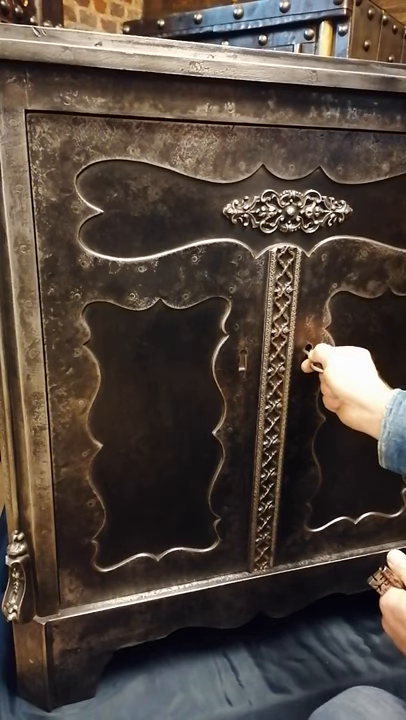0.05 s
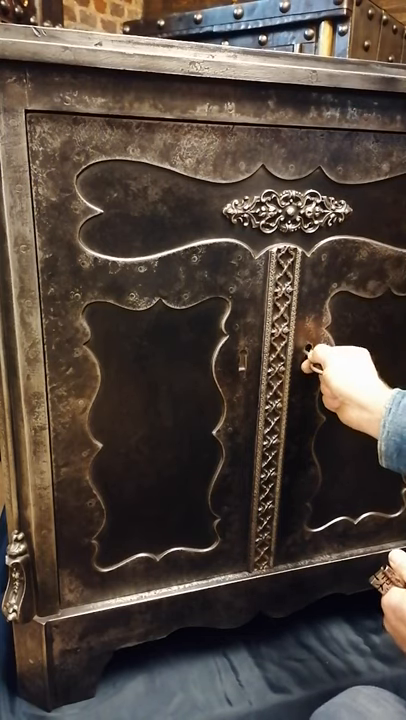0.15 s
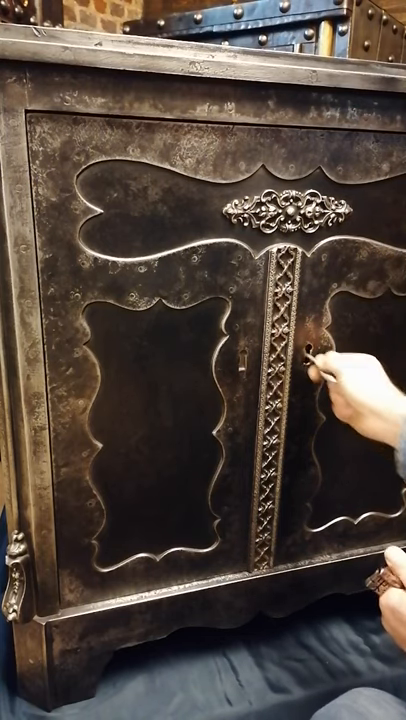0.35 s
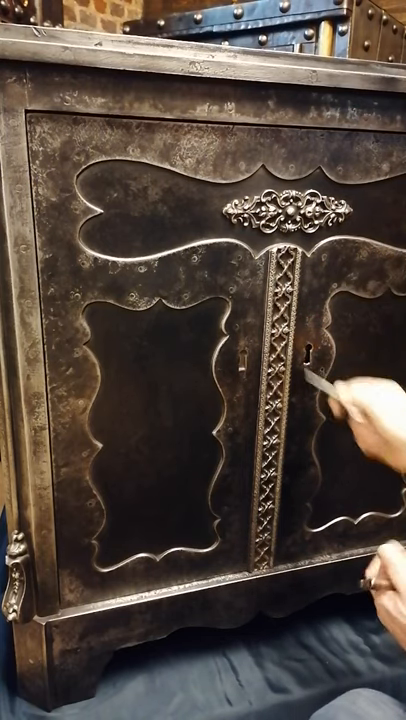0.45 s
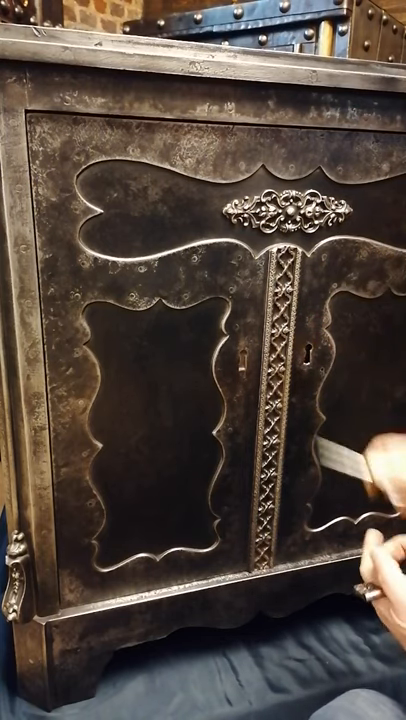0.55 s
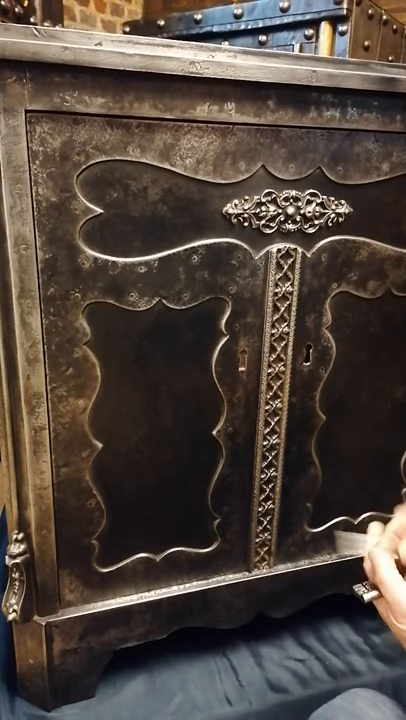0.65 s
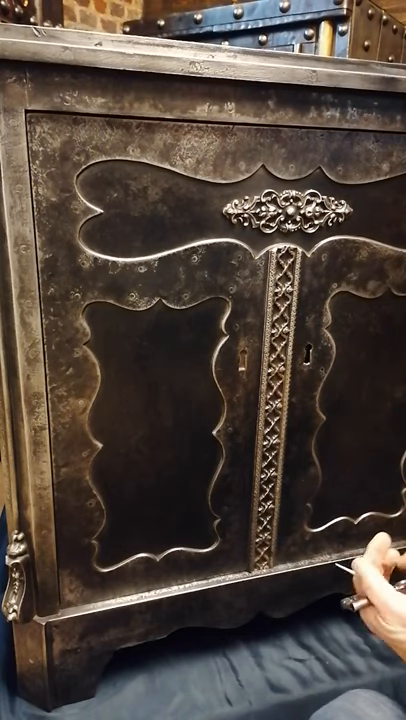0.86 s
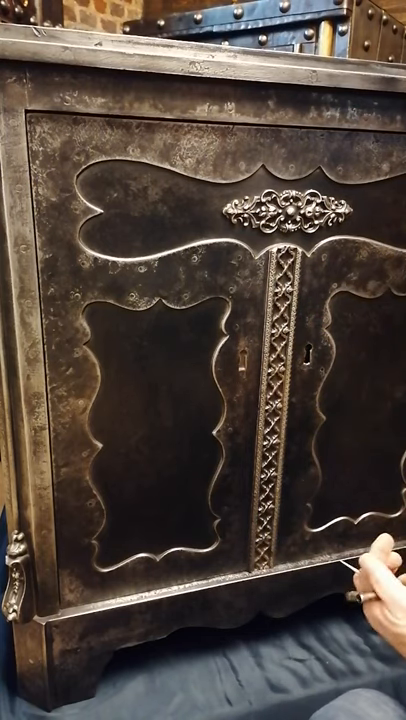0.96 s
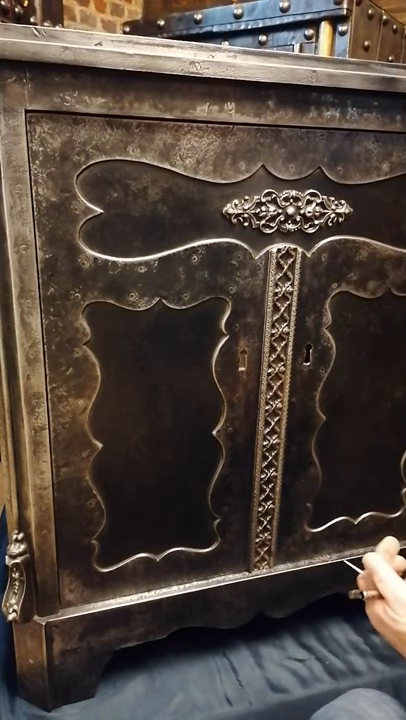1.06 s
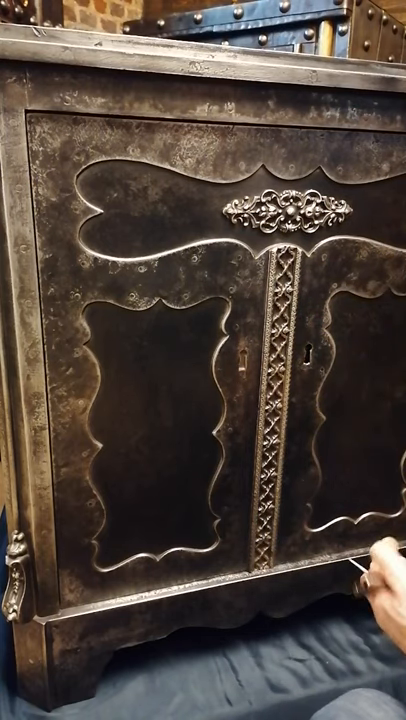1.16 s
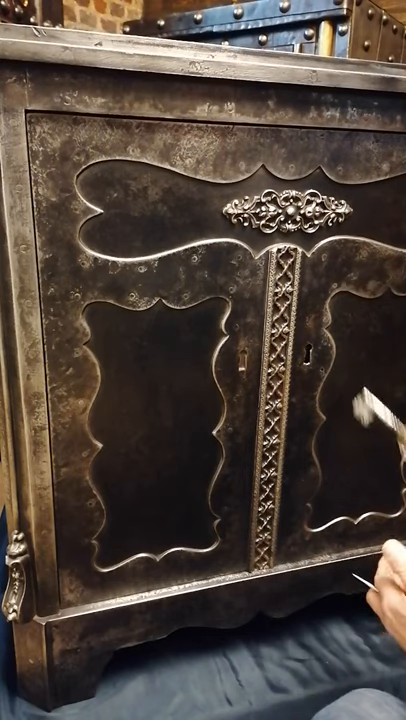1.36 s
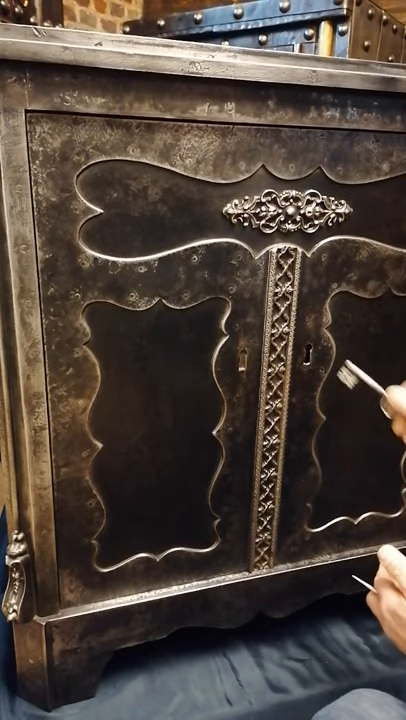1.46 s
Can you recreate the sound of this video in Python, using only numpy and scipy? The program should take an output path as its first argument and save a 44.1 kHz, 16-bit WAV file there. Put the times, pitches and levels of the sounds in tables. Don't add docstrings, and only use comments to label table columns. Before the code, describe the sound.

A heavy iron lock bolt clunks in a cabinet door. Soft dull lever knocks from 0.09 seconds lead to a loud, bouncing slam at 0.22, with deep boom and metallic ring decaying. At 0.46 a sharp click starts the key's gritty scrape; a bright chink rings at 0.57, fading by 0.75. A tiny click follows at 0.79, then quiet room hiss and faint low motor hum, left-heavy.

```python
import sys
import numpy as np
from scipy import signal
from scipy.fft import rfft, irfft
from scipy.io import wavfile

SR = 44100
rng = np.random.default_rng(int(sys.argv[2]) if len(sys.argv) > 2 else 0)


def wav_record(signal):
    frames = np.transpose(np.atleast_2d(signal))
    bounded = np.clip(frames, -1, 1)
    quanta = np.round(bounded * 32767).astype(np.int16)
    wavfile.write(sys.argv[1], SR, quanta)


def to_linear_factor(level_db):
    exponent = np.asarray(level_db, float) / 20
    return 10 ** exponent


N = 66150

# start_s [s], level_db [dB]
BOLT_BLOWS = [
    (.2205, -10.5),
    (.2222, 0),
    (.2238, -0.5),
    (.2275, -4),
    (.2325, -10),
    (.238, -13),
    (.262, -13.5),
]


def on_hz(table, hz):
    pitch, value = np.array(table).T
    return np.interp(np.log(hz), np.log(pitch), value)


def mix_alike(one, other, alike):
    alike = np.clip(alike, 0, 1)
    return alike * one + np.sqrt(1 - alike * alike) * other


def ports(one, other, hz):
    # pitch_hz [Hz], likeness [0-1]
    likeness = [(100, 1.2), (300, 1.2), (600, 0.58), (1200, 0), (3000, 0.05), (9000, 0.03)]
    # pitch_hz [Hz], lead_db [dB]
    left_lead = [(60, 5), (150, 7), (1000, 6), (4000, 6.8), (9000, 8.5), (14000, 5)]
    half_lead_db = on_hz(left_lead, hz) / 2
    right = mix_alike(one, other, on_hz(likeness, hz))
    return np.array([one * to_linear_factor(half_lead_db), right * to_linear_factor(-half_lead_db)])


def band(hz, octaves, size):
    f = np.maximum(np.fft.rfftfreq(size, 1 / SR), 1)
    bell = np.exp(-(np.log2(f / hz) / octaves) ** 2)
    return irfft(rfft(rng.standard_normal((2, size))) * bell, size)


def unit_band(hz, octaves, size):
    return ports(*band(hz, octaves, size), hz) * np.sqrt(SR / hz / octaves / 4)


def fade(t60, size):
    return to_linear_factor(-60 * np.arange(size) / SR / max(t60, .004))


def rise(s, size):
    return 1 - np.exp(-(np.arange(size) / SR / max(s, 1e-4)) ** 2)


def dense(colour, t60, size=N // 2):
    centres = 100 * 2 ** (np.arange(23) / 3)
    gains = to_linear_factor(on_hz(colour, centres))
    noise = rfft(rng.standard_normal((2, size)))
    octave = np.log2(np.maximum(np.fft.rfftfreq(size, 1 / SR), 1))
    out = 0
    for hz, gain in zip(centres, gains):
        bell = np.exp(-((octave - np.log2(hz)) / .27) ** 2)
        out = out + gain * ports(*irfft(noise * bell, size), hz) * fade(t60(hz), size)
    return out / np.sqrt(np.sum(gains ** 2 * centres) / SR)


def modes(table, split=0., size=16384):
    twin = to_linear_factor(2)
    w = 2 * np.pi * np.arange(size) / SR
    out = 0
    for hz, db, t60 in table:
        pair = np.array([np.sin(w * hz), np.cos(w * hz)])
        if split:
            near = band(hz, split, size)
            near = near / np.std(near) / np.sqrt(2)
            pair = (pair + twin * near) / np.hypot(1, twin)
        out = out + to_linear_factor(db) * fade(t60, size) * ports(*pair, hz)
    return out


def strike(hits, response):
    push = np.zeros(N)
    for s, db in hits:
        push[int(s * SR)] += to_linear_factor(db)
    return signal.fftconvolve(push[None], response, axes=1)[:, :N]


def beats(hits, t60):
    return strike(hits, fade(t60, N // 8)[None])


def motor_hum():
    # start_s [s], pitch_hz [Hz], level_db [dB], left_lead_db [dB]
    path = [(0, 62, -71, 4), (.12, 62, -69, 4), (.24, 61.5, -67, 6), (.29, 61, -74, 6), (.38, 60, -66, 6),
            (.47, 60.5, -68, 6), (.56, 62, -65, 7), (.63, 60, -73, 6), (.76, 61, -71, 5), (.88, 62, -63, 6),
            (1.05, 62.5, -61.5, 6), (1.17, 62.7, -64, 1), (1.3, 63.3, -66.5, 0), (1.5, 62.6, -70, 2)]
    t = np.arange(N) / SR
    s, hz, db, lead_db = np.array(path).T
    side_db = np.interp(t, s, lead_db) / 2 * np.array([[1], [-1]])
    phase = 2 * np.pi * np.cumsum(np.interp(t, s, hz)) / SR + 3.0
    return np.sqrt(2) * to_linear_factor(np.interp(t, s, db) + side_db) * np.sin(phase)


def room_hiss():
    # pitch_hz [Hz], level_db [dB per Hz]
    colour = [(20, -8.5), (60, -7.5), (110, -11), (277, -21.5), (485, -22.5), (2000, -28.5), (5380, -36.5),
              (10000, -43.5), (16000, -42.5)]
    # start_s [s], level_db [dB]
    swell = [(0, 1), (.7, 5.5), (.9, 5), (1.2, 2.5), (1.5, 2.5)]
    f = np.maximum(np.fft.rfftfreq(N, 1 / SR), 1)
    one, other = irfft(rfft(rng.standard_normal((2, N))) * to_linear_factor(on_hz(colour, f)), N)
    pair = np.array([one * to_linear_factor(2.5), mix_alike(one, other, 0.1)])
    swell_db = np.interp(np.arange(N) / SR, *np.array(swell).T)
    return pair / np.std(one) * to_linear_factor(-75.5 + swell_db)


def sleeve_rustle():
    # centre_s [s], half_length_s [s], pitch_hz [Hz], width [octaves], level_db [dB]
    rustles = [
        (0.74, .07, 2500, 0.47, -82),
        (1, 0.044, 7000, 0.36, -90),
        (.02, 0.066, 205, 1, -75.5),
    ]
    t = np.arange(N) / SR
    out = 0
    for s, half, hz, wide, db in rustles:
        cloth = band(hz, wide, N)
        out = out + cloth / np.std(cloth) * to_linear_factor(db) * np.exp(-((t - s) / half) ** 2)
    return out


def levers():
    # start_s [s], level_db [dB], dull_top_hz [Hz], t60_s [s]
    shifts = [
        (.0885, -59.5, 560, .2),
        (.103, -71, 1300, .12),
        (.133, -63.5, 600, 0.29),
        (.182, -56, 1300, .12),
        (0.195, -52.5, 800, 0.24),
        (0.214, -43, 550, .1),
    ]
    out = 0
    for s, db, hz, t60 in shifts:
        colour = [(100, -8), (hz, 0), (1.5 * hz, -25), (4 * hz, -42)]
        knock = dense(colour, lambda f: t60, size=8192)
        out = out + strike([(s, db)], rise(0.0012, 8192) * knock)
    return out


def door_boom():
    # pitch_hz [Hz], level_db [dB], t60_s [s]
    deep_modes = [(151.8, 4.5, 0.27), (137.5, -8.5, 0.19), (143.5, -11.5, 0.93)]
    # start_s [s], level_db [dB]
    pushes = [
        (.09, -66),
        (.184, -51.5),
        (.2155, -40),
        (.2235, -35.5),
        (.4, -61),
        (.66, -63),
        (.78, -71),
        (.9, -71),
    ]
    return strike(pushes, modes(deep_modes, size=N // 2) * rise(0.013, N // 2))


def key_clicks():
    # start_s [s], level_db [dB], pitch_hz [Hz], width [octaves], t60_s [s]
    clicks = [(0.4612, -42, 9800, 0.14, 0.022), (0.4595, -49, 4850, 0.64, 0.012),
              (.2145, -61, 2500, 1.2, .1), (.2175, -51.5, 4400, 1.3, .1), (.53, -69, 13000, .3, 0.43),
              (.551, -55, 9700, 0.092, .03), (0.461, -61, 1730, 0.22, 0.64), (0.461, -66, 4650, 0.071, 0.5),
              (0.465, -47.5, 1880, 0.17, 0.042), (0.466, -53, 7730, 0.053, 0.033),
              (0.521, -57, 7300, 0.12, 0.097), (0.5218, -50, 9400, 0.067, 0.024),
              (0.7925, -70.5, 1060, 0.071, 0.03), (.7925, -62, 1340, 0.11, 0.033),
              (.7918, -68, 13000, .3, .012), (0.7938, -58.5, 1970, .2, 0.014),
              (.7918, -62.5, 5200, 1, 0.0092), (0.7921, -62.5, 9400, 0.23, 0.014)]
    out = 0
    for s, db, hz, wide, t60 in clicks:
        ring = unit_band(hz, wide, 16384) * rise(0.00017, 16384)
        decay = fade(t60, 16384) + to_linear_factor(-19) * fade(0.5, 16384)
        tick = modes([(hz, 2, 2.06 / hz / wide)], size=2048)
        out = out + strike([(s, db)], tick) + strike([(s, db)], ring * decay)
    return out


def bolt_crack():
    # pitch_hz [Hz], level_db [dB per Hz]
    colour = [(110, -33.5), (300, -20.5), (700, -12), (1700, -17), (3200, -17.5), (5200, -14.5),
              (7000, -22.5), (9600, -14), (15500, -23.5)]
    noise = strike([(BOLT_BLOWS[0][0], 0)], dense(colour, lambda f: np.inf, size=8192))
    return to_linear_factor(-29.5) * noise * beats(BOLT_BLOWS, 0.026)


def bolt_ring():
    # pitch_hz [Hz], level_db [dB], t60_s [s]
    panel_modes = [(278.5, -15.5, 0.87), (382.3, -13.5, 0.17), (433.4, -15, 0.6), (585, -12.5, 0.68),
                   (663, -14, 0.46), (750, -18, .5), (805, -10.5, 0.26), (1016, -14, 0.24),
                   (1091, -17.5, 0.62), (1132, -11.5, 0.18), (1221, -14, 0.24)]
    # pitch_hz [Hz], level_db [dB], t60_s [s]
    upper_modes = [(1599, -17.5, 0.49), (1747, -15, 0.42), (1896, -16, 0.52), (2062, -18, 0.68),
                   (2316, -23.5, .4), (2853, -20, 0.67)]
    # pitch_hz [Hz], level_db [dB], t60_s [s]
    plate_modes = [(2993, -10.5, 0.28), (3860, -17.5, .35), (4592, -12, 0.11), (4695, -7.5, .45),
                   (4800, -13, .2), (5080, -13, .2), (5460, -13.5, 0.37), (5400, -13, .15),
                   (7235, -20.5, .3), (9450, -7, 0.15), (12860, -7, 0.058)]
    # pitch_hz [Hz], level_db [dB], t60_s [s]
    clang_modes = [(1579, -33.5, 0.1), (1772, -28.5, 0.051), (5400, -38, .04), (9650, -39.5, .05),
                   (12960, -46.5, .04), (14900, -46.5, .04)]
    door = to_linear_factor(-31) * (modes(panel_modes, .03) + modes(upper_modes, .03))
    plate = to_linear_factor(-37) * modes(plate_modes, .012)
    ring = door + plate + modes(clang_modes)
    return strike(BOLT_BLOWS[1:2], ring * rise(0.00071, 16384))


def iron_tail():
    # pitch_hz [Hz], level_db [dB per Hz]
    colour = [(110, -29.5), (230, -16), (420, -12.5), (1000, -13.5), (2480, -18), (4740, -15), (7000, -26),
              (9600, -15.5), (15500, -31)]
    # pitch_hz [Hz], t60_s [s]
    decay = [(100, 1), (500, 0.69), (2000, 0.54), (6000, 0.46), (10000, 0.28), (14000, 0.27)]
    # pitch_hz [Hz], level_db [dB], width [octaves], t60_s [s]
    crowds = [(1770, -42, 0.3, 0.72), (4750, -42.5, 0.065, .5), (5500, -47, .07, 0.79),
              (7200, -52, .08, .4), (9430, -42.5, 0.036, .45), (12700, -62, .05, .3)]
    tail = dense(colour, lambda f: on_hz(decay, f)) * rise(0.012, N // 2)
    case = 0
    for hz, db, wide, t60 in crowds:
        case = case + to_linear_factor(db) * unit_band(hz, wide, N // 2) * fade(t60, N // 2)
    return strike([(BOLT_BLOWS[0][0], 0)], to_linear_factor(-32) * tail + case * rise(.006, N // 2))


def key_scrape():
    # start_s [s], level_db [dB]
    effort = [
        (.44, -95),
        (.459, -70),
        (.463, -46),
        (.5, -51.5),
        (.55, -51.5),
        (.6, -56.5),
        (.65, -63.5),
        (.72, -77.5),
        (.76, -130),
    ]
    # pitch_hz [Hz], level_db [dB per Hz]
    colour = [(150, -33.5), (300, -7.5), (883, -19.5), (1870, -18), (3400, -11.5), (5500, -19), (9500, -19),
              (15000, -47)]
    slips_per_s, spread_db = 240, -1
    effort_db = np.interp(np.arange(N) / SR, *np.array(effort).T)
    slip_db = spread_db * np.minimum(rng.exponential(1, N), 3) + effort_db
    slips = (rng.random(N) < slips_per_s / SR) * rng.choice([-1, 1], N) * to_linear_factor(slip_db)
    response = dense(colour, lambda f: 0.091, size=4096)
    return signal.fftconvolve(slips[None], response, axes=1)[:, :N] * to_linear_factor(-9.0)


def key_shaft():
    # pitch_hz [Hz], level_db [dB], t60_s [s]
    shaft_modes = [(1837, -63.5, 0.14), (3390, -57.5, 0.39), (3560, -60, 0.16), (4740, -63.5, 0.23),
                   (5850, -65, .2)]
    return strike([(.4612, 0)], modes(shaft_modes, .05))


def door_knocks():
    # start_s [s], level_db [dB]
    knocks = [
        (.49, -56.5),
        (.535, -56.5),
    ]
    # pitch_hz [Hz], level_db [dB], t60_s [s]
    knock_modes = [(276.4, -1, 0.32), (500, -19, 0.19), (640.4, -7.5, 0.26), (753, -13, 0.46)]
    return strike(knocks, modes(knock_modes, .012, size=8192) * rise(0.0031, 8192))


def blade_chink():
    # start_s [s], level_db [dB]
    touches = [
        (.566, 3),
        (.5685, -12),
        (.571, 9),
        (.574, -22),
        (.579, -17),
    ]
    # start_s [s], level_db [dB]
    rings = [
        (.5655, 1.5),
        (.593, -8),
        (.641, -14),
    ]
    # pitch_hz [Hz], level_db [dB], t60_s [s]
    blade_modes = [(5840, 1, 0.29), (6100, -5, .3), (6100, -3.5, 0.2), (6530, -18, .2), (7165, 0, 0.23),
                   (7420, 2.5, 0.11), (7950, -4, .15), (8170, -6, 0.1), (8750, -14, 0.14), (9500, -2, 0.13),
                   (9800, 8, 0.096), (9700, -4, 0.097), (12360, -6, 0.13), (13610, -7, .15)]
    colour = [(3000, -9.0), (5000, -22), (6000, -2.5), (8000, -4), (9800, 6.0), (12500, -12), (15500, -16)]
    shimmer = strike([(touches[0][0], 0)], dense(colour, lambda f: np.inf, size=16384))
    tail = strike([(touches[2][0], -56.5)], fade(0.3, 16384)[None])
    envelope = to_linear_factor(-56.5) * beats(touches, 0.022) + tail
    ring = strike(rings, modes(blade_modes, .018, size=16384) * rise(0.0028, 16384))
    return shimmer * envelope + to_linear_factor(-58) * ring


def passing_whine():
    centre_s, half_s = 0.99, 0.068
    t = np.arange(N) / SR
    whine = band(9350, 0.014, N)
    return whine / np.std(whine) * to_linear_factor(-92) * np.exp(-((t - centre_s) / half_s) ** 4)


def scene():
    room = motor_hum() + room_hiss() + sleeve_rustle() + passing_whine()
    lock = levers() + door_boom() + bolt_crack() + bolt_ring() + iron_tail()
    key = key_clicks() + key_scrape() + key_shaft() + door_knocks() + blade_chink()
    return room + lock + key


def roll_off(x):
    return signal.sosfilt(signal.butter(12, 16290, fs=SR, output="sos"), x)


def record(dry):
    low = signal.sosfiltfilt(signal.butter(6, 10000, fs=SR, output="sos"), dry)
    shelved = low + to_linear_factor(-9) * (dry - low)
    mix = signal.sosfilt(signal.ellip(6, .2, 30, 15250, fs=SR, output="sos"), shelved)
    return roll_off(mix)


dry = scene()
out = record(dry)
wav_record(out)
```